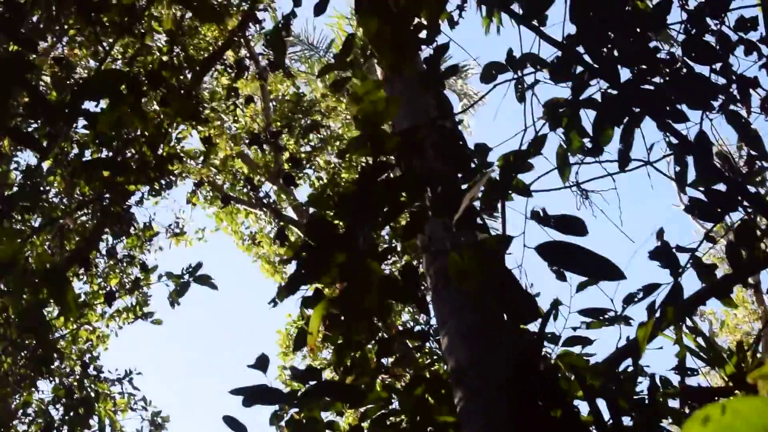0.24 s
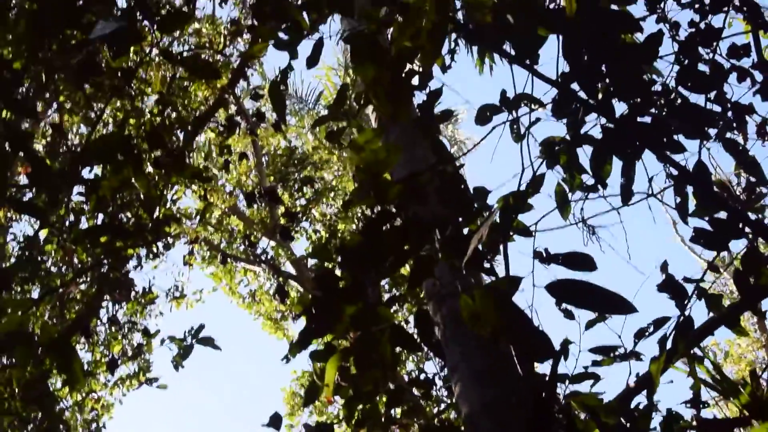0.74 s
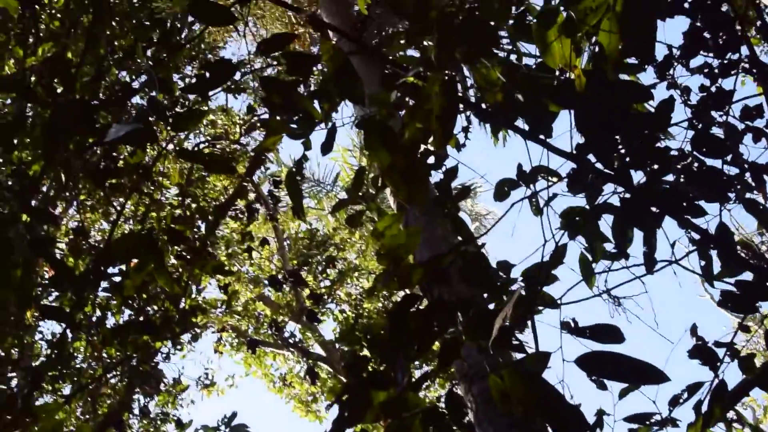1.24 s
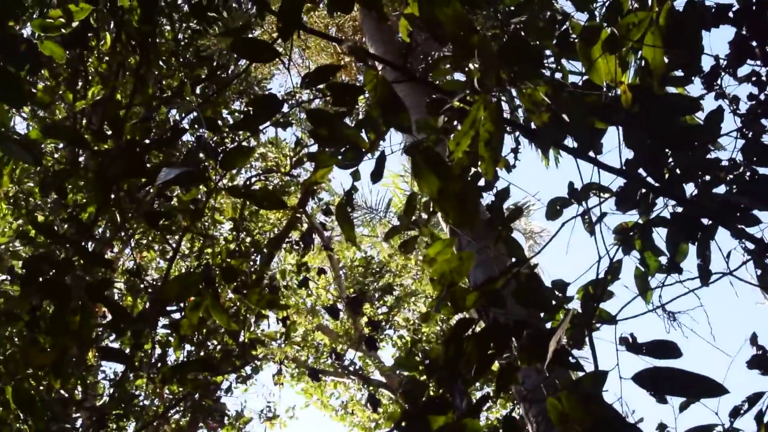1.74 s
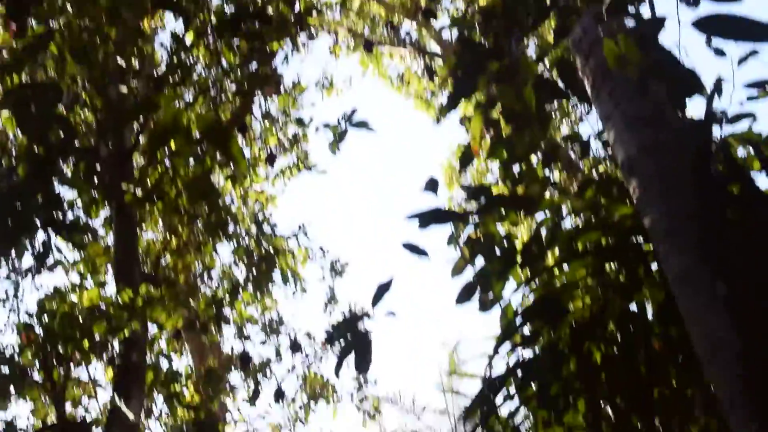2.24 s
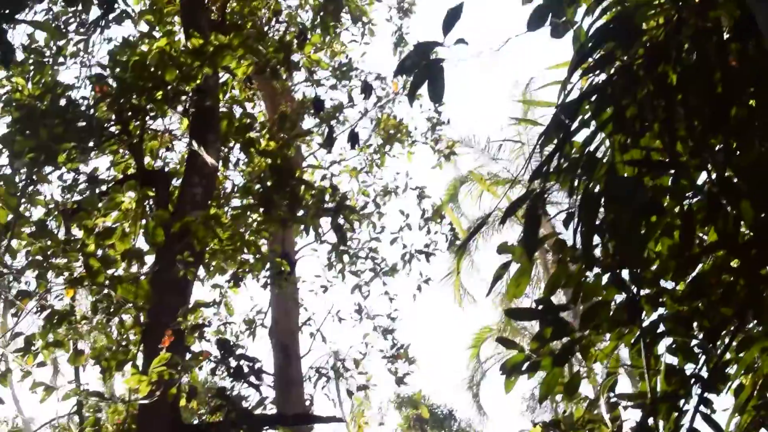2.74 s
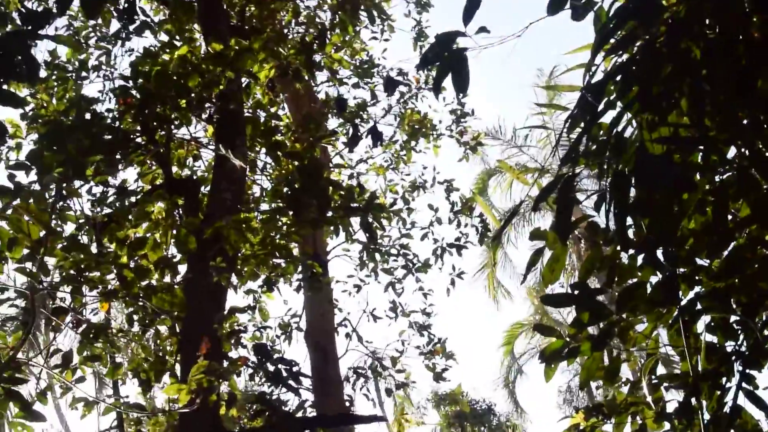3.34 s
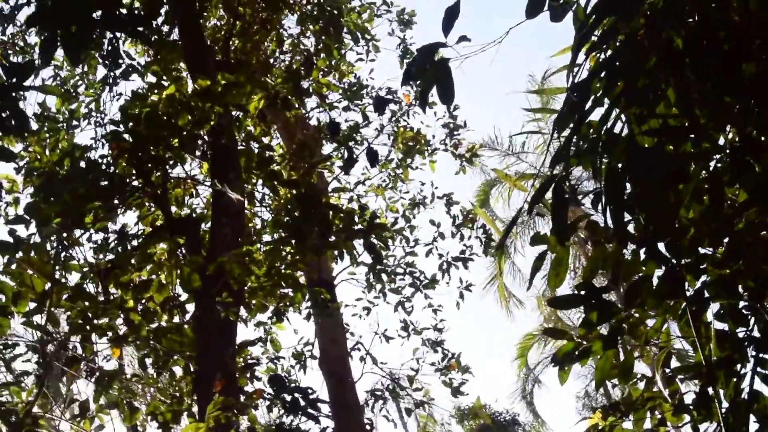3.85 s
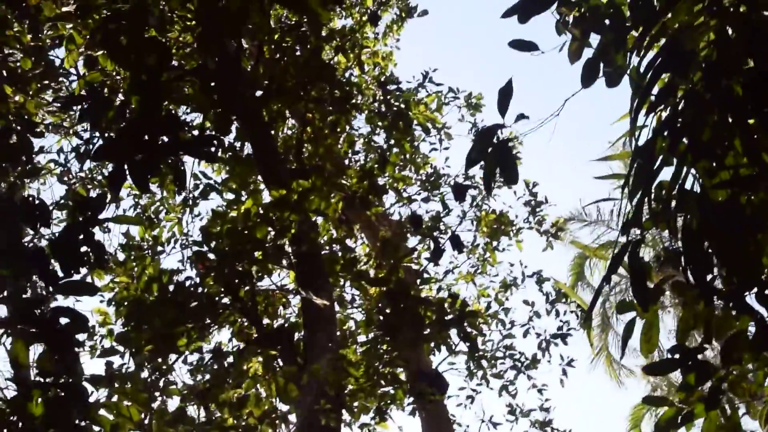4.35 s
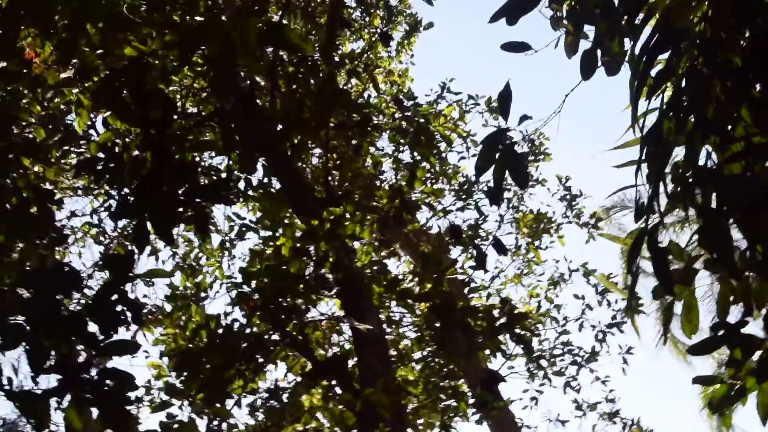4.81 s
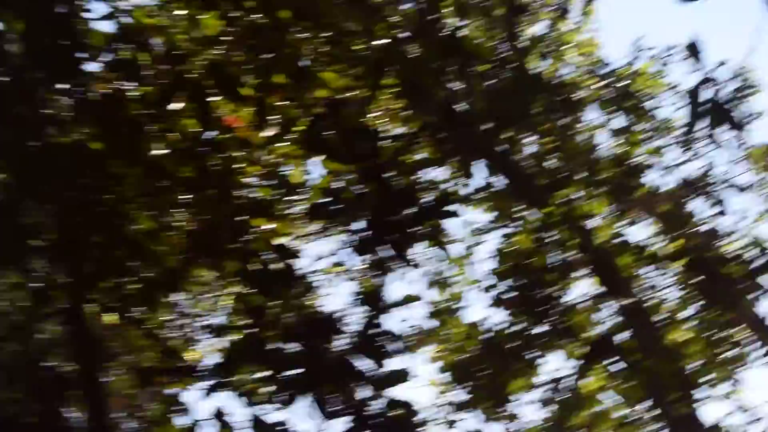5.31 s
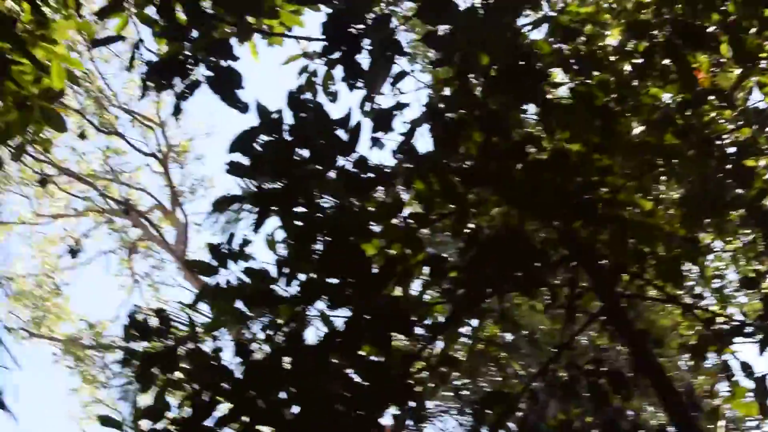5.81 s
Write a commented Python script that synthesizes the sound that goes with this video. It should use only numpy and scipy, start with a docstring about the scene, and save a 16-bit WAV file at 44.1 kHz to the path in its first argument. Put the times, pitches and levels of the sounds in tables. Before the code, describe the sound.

A huge camp of fruit bats squeals, rasps and chatters in forest trees, a dense continuous shrill din with a few nearer cries standing out.

```python
"""Fruit bat camp squabbling in the trees

A large camp of fruit bats squabbles high in forest trees. Hundreds of overlapping squeals, rasps and
chattering yaps merge into a shrill din; a few nearer bats stand out. Each cry is a train of voice pulses
mixed with rasping noise and shaped by a throat resonance. Trunks and leaves scatter the calls. Shaped noise
stands for the far side of the camp and the forest. Very faint low clicks of overload, where the loudest
cries clip, are short smooth pulses placed at set times; there is also a very faint hiss.
"""
import sys
import numpy as np
from scipy import signal
from scipy.fft import rfft, irfft, next_fast_len
from scipy.io import wavfile

SR = 44100
rng = np.random.default_rng(int(sys.argv[2]) if len(sys.argv) > 2 else 0)


def transcribe(signal):
    """Save signal, clipped to [-1, 1], as a 16-bit WAV file at the path in sys.argv[1]."""
    frames = np.atleast_2d(signal).T
    limited = np.clip(frames, -1, 1)
    pcm = np.round(limited * 32767).astype(np.int16)
    wavfile.write(sys.argv[1], SR, pcm)


N = 267775  # length of the scene in samples
PITCH_HZ = 545.6  # the usual pitch of a bat's voice
BAND_HZ = 9550  # upper limit of the voices' overtones, and of what the two channels pass


# Rise and fall of the din's low register: start_s, level_db (added to the level of the din)
LOW_CURVE = [(0.0, 0.5), (0.69, 0.5), (0.83, -0.5), (1.38, 1), (1.52, -0.8), (1.79, 1.3), (2.07, -0.3),
             (2.35, -0.2), (3.31, -1.0), (4.97, 0.26), (5.1, -0.3), (6.07, 0.15)]
# The same for the middle register: start_s, level_db
MIDDLE_CURVE = [(0.0, -1.5), (1.24, -2), (1.93, -0.1), (2.48, 1), (3.31, 0), (3.45, 1), (5.1, 0.5),
                (5.24, 2.5), (5.52, -2), (5.66, 1), (6.07, -1)]
# The same for the top register: start_s, level_db
TOP_CURVE = [(0.0, 1), (0.69, -1.9), (1.38, 1.0), (1.66, -1.5), (1.79, 1), (2.35, -1), (3.04, 1.4),
             (3.17, 0), (4.55, 0.2), (4.69, -1.5), (5.66, -0.3), (5.93, -3.5), (6.07, -1)]
# Centres of the three registers: centre_hz
REGISTER_CENTRES = [2700, 4250, 6600]


def colony():
    """The din of the camp swells and sinks a little in its low, middle and top register."""
    din = voices()
    out = np.zeros((2, N))
    time_s = np.arange(N) / SR
    curves = (LOW_CURVE, MIDDLE_CURVE, TOP_CURVE)
    for curve, share in zip(curves, np.eye(3)):
        # each register fades into its neighbours, so together they give back the whole din
        register = filtered(din, lambda hz: np.interp(np.log(hz + 1), np.log(REGISTER_CENTRES), share))
        level_db = np.interp(time_s, *np.transpose(curve))
        out += amp(level_db) * register
    return amp(-17.5) * out


def voices():
    """Seven kinds of call, each from its own crowd, over the blur of far animals."""
    squeals = crowd(count=200, throat_hz=2853, variety=0.14, length=0.06, syllables=2, rough=0.13,
                    scatter_db=0.5, glide=0.1, arch=0.0801, leak=1.0)
    whines = crowd(count=110, throat_hz=2930, variety=0.13, length=0.045, syllables=2, rough=0.077,
                   scatter_db=0.0, glide=0.043, arch=0.033, leak=0.48)
    shrieks = crowd(count=200, throat_hz=5240, variety=0.21, length=0.07, syllables=2, rough=0.2,
                    scatter_db=0.0, glide=0.0696, arch=0.0622, leak=0.087)
    yaps = crowd(count=170, throat_hz=2776, variety=0.16, length=0.02, syllables=5, rough=0.31,
                 scatter_db=-0.5, glide=0.1205, arch=0.086, leak=0.46)
    wails = crowd(count=130, throat_hz=3050, variety=0.16, length=0.1, syllables=1, rough=0.07,
                  scatter_db=0.1, glide=0.035, arch=0.015, leak=0.25)
    moans = crowd(count=190, throat_hz=1037, variety=0.053, length=0.05, syllables=1, rough=0.28,
                  scatter_db=-1.2, glide=0.073, arch=0.055, leak=0.01)
    grumbles = crowd(count=150, throat_hz=565, variety=0.04, length=0.06, syllables=1, rough=0.2,
                     scatter_db=-2.0, glide=0.064, arch=0.038, leak=0.002)
    shrill = amp(-6.0) * in_canopy(squeals, wet_db=-2.0)
    shrill += amp(-13.5) * in_canopy(whines, wet_db=-3.0)
    shrill += amp(-13.0) * in_canopy(shrieks, wet_db=-0.5)
    shrill += amp(-7.5) * in_canopy(yaps, wet_db=-1.5)
    shrill += amp(-14) * in_canopy(wails, wet_db=-1.5)
    murmur = amp(-33.0) * in_canopy(moans, wet_db=-4.0)
    murmur += amp(-39.5) * in_canopy(grumbles, wet_db=5.0)
    return spread(shrill + murmur + amp(-4.0) * far_side())


def crowd(count, throat_hz, variety, length, syllables, rough, scatter_db, glide, arch, leak):
    """Many bats, each giving a bout of like calls; they are shared out between two halves of the camp."""
    halves = np.zeros((2, N))
    bats = np.clip(rng.standard_normal((count, 5)), -1.7, 1.7)
    bouts = rng.random((count, 8, 2))
    for i, ((size, voice, mouth, loud, harsh), bout) in enumerate(zip(bats, bouts)):
        # bouts start at roughly even steps, the first ones just before the scene opens
        start_s = (i + bout[0, 0]) / count * (N / SR + 0.4) - 0.4
        length_s = length * np.exp(0.35 * size)
        pitch_hz = PITCH_HZ * np.exp(0.11 * voice)
        own_throat_hz = throat_hz * np.exp(variety * mouth)
        own_rough = rough * np.exp(0.5 * harsh)
        # bats are loudest near their usual resonance
        level_db = scatter_db * loud + along(VOICE_TONE, own_throat_hz)
        calls = 1 + i % round(syllables)
        for pause, slide in bout[:calls]:
            own_glide = glide * (2 * slide - 1)  # up or down
            call = cry(length_s, pitch_hz, own_throat_hz, own_rough, own_glide, arch, leak)
            add(halves[i % 2], start_s, amp(level_db) * call)
            start_s += length_s * (1.3 + pause)
    return unit(halves)


# Tone balance of many bats together: frequency_hz, level_db (relative)
VOICE_TONE = [(100, -69), (350, -52.5), (560, -31.5), (780, -34), (1080, -26), (1450, -26.5), (1800, -11),
              (2150, -1), (2550, 1), (3100, 1), (4000, -3.5), (5300, -8), (7200, -7), (9300, -12.5)]


def cry(length, pitch_hz, throat_hz, rough, glide, arch, leak=0.061, jitter=0.047, rattle_db=4.5):
    """One cry: pulses from the larynx on an arched pitch, mixed with a rattling rasp, through the throat."""
    n = max(int(length * SR), SR // 100)
    rough = np.clip(rough, 0, 1)
    u = np.linspace(-1, 1, n)  # from the start to the end of the cry
    bend = glide * u + arch * (1 / 3 - u * u)
    bend += 0.0035 * wobble(60, n)  # a slower waver, as a share of the pitch
    bend += (0.0036 + jitter * rough) * wobble(220, n)  # a quick shake, stronger in harsh cries
    cycles = np.cumsum(pitch_hz * np.exp(bend)) / SR + rng.random()
    offset = cycles % 1 - 0.5  # place within each cycle
    opening = np.cos(np.pi * offset) ** 2
    pulses = unit(np.sinc(2 * BAND_HZ / pitch_hz * offset) * opening)
    rasp = unit(rng.standard_normal(n) * opening)
    source = np.sqrt(1 - rough ** 2) * pulses + rough * rasp
    source *= amp(rattle_db * np.sqrt(rough) * wobble(260, n))
    source *= np.sqrt(np.abs(1 - u * u))  # swells and fades
    source = np.pad(source, (32, 160))  # room for the throat to ring
    width_hz = throat_hz * (0.13 + 0.39 * rough)  # a harsh cry comes from a wide, damped mouth

    def throat_and_leaves(hz):
        damping = 1j * hz * width_hz
        resonance = (damping / (throat_hz ** 2 - hz * hz + damping)) ** 2
        throat = resonance + leak * amp(along(VOICE_TONE, hz))
        leaves = 1 / np.sqrt(1 + (hz / 8200) ** 10)  # foliage swallows the highest overtones
        return throat * leaves

    return unit(filtered(source, throat_and_leaves))


def near_bats():
    """The closest animals squeal, screech and moan above the din; the forest answers."""
    direct = near_squeals() + near_screeches() + near_moans()
    return direct + amp(-8.5) * spread(forest(direct.mean(axis=0)))


# Clear squeals of nearer bats: start_s, length_s, throat_hz (resonance),
# level_db (before the gain of the group), glide_share (of the pitch, either side of the middle)
NEAR_SQUEALS = [(0.0, 0.07, 3560, -27.5, 0.014), (0.105, 0.024, 2574, -19, -0.012),
                (0.13, 0.048, 2620, -33, 0.029), (0.172, 0.034, 2516, -21, 0.0017),
                (0.21, 0.088, 4250, -29.5, -0.0051), (0.222, 0.06, 2570, -25, -0.022),
                (0.31, 0.2, 3440, -26.5, 0.006), (0.53, 0.095, 3530, -27, -0.012),
                (0.56, 0.16, 2934, -30, -0.017), (0.64, 0.13, 3520, -33, .008),
                (0.93, 0.26, 2552, -26.5, -0.0021), (1.01, 0.061, 3790, -31, -0.014),
                (1.08, .15, 5150, -36, .015), (1.25, 0.057, 1770, -35, 0.03), (1.4, .07, 5920, -34.5, 0),
                (1.71, 0.056, 2050, -33, -0.0044), (2.33, 0.043, 4000, -30, 0.019),
                (2.395, 0.04, 4280, -25.5, -0.0018), (2.44, .05, 4700, -32, .01),
                (2.545, 0.085, 2170, -26, 0.012), (2.66, 0.072, 4440, -33, 0.0064),
                (2.77, 0.06, 3400, -23, 0.0041), (2.79, 0.081, 4450, -31.5, -0.00018),
                (2.81, 0.058, 6850, -33, .004), (2.89, 0.094, 2480, -30, -0.012),
                (2.91, .06, 3270, -26.5, .015), (3.02, 0.042, 3000, -24, 0.029),
                (3.17, .06, 3250, -28.5, 0.0074), (3.425, 0.065, 3260, -29, -0.0011),
                (3.43, 0.038, 4830, -29, 0.0059), (3.5, 0.073, 4930, -29, 0.0071),
                (3.52, 0.059, 3200, -24, .02), (3.6, 0.12, 3845, -31, .004),
                (3.68, 0.05, 4450, -29.5, -0.0036), (3.68, 0.076, 4975, -33, 0),
                (4.03, 0.093, 3900, -30, -.015), (4.09, 0.15, 2550, -27, 0.01),
                (4.19, 0.051, 3230, -25.5, -0.0041), (4.3, .14, 3660, -31.5, -0.012),
                (4.35, 0.15, 4210, -32.5, 0.0016), (4.325, 0.062, 2555, -24, 0.012),
                (4.58, 0.069, 2744, -24, -0.00037), (4.65, 0.06, 2910, -26, 0.0077),
                (4.715, 0.045, 2316, -25, -0.009), (4.795, 0.16, 2450, -23.5, 0.0023),
                (4.955, 0.031, 2440, -30, 0.0035), (4.9, 0.11, 2000, -31.5, -0.012),
                (5.02, .08, 1883, -36, -0.021), (5.345, 0.066, 2490, -22, -0.033),
                (5.59, 0.063, 3230, -25.5, 0.03), (5.62, 0.064, 3060, -32, 0.0094),
                (5.67, 0.11, 2544, -28, 0.0072), (5.76, 0.17, 3600, -33, 0.0051)]


def near_squeals():
    """Clear cries, made mostly of voice pulses with little rasp."""
    return amp(-3.0) * near_cries(NEAR_SQUEALS, rough=0.062)


# Harsh screeches of nearer bats: start_s, length_s, throat_hz (resonance),
# level_db (before the gain of the group)
NEAR_SCREECHES = [(0.309, 0.051, 2887, -24), (0.508, 0.079, 2622, -21.5), (0.727, .1, 2924, -27),
                  (1.378, 0.06, 2100, -27), (1.382, 0.073, 6160, -33), (1.749, 0.22, 2860, -28),
                  (2.28, 0.058, 3175, -21), (2.427, 0.15, 4590, -29), (3.024, 0.11, 7400, -34),
                  (3.022, 0.077, 2922, -24), (3.666, 0.078, 4850, -41), (4.026, 0.14, 3870, -29),
                  (4.455, 0.16, 3410, -27), (5.193, 0.19, 3720, -28.5)]


def near_screeches():
    """Harsh cries with much rasp and a wide throat resonance; their pitch does not glide."""
    rows = [(*row, 0) for row in NEAR_SCREECHES]
    return amp(-2.5) * near_cries(rows, rough=0.686)


# Soft, low moans of nearer bats: start_s, length_s, throat_hz (resonance),
# level_db (before the gain of the group), glide_share (of the pitch, either side of the middle)
NEAR_MOANS = [(0.85, 0.088, 994, -47, -0.033), (0.91, 0.086, 1383, -45.5, -0.0053),
              (1.1, 0.064, 1190, -50, -0.032), (1.34, .09, 1010, -47, -0.003),
              (1.84, 0.083, 1030, -48, -0.0048), (1.97, 0.07, 1000, -54, -0.0036),
              (2.14, 0.069, 994, -50, -0.00043), (2.6, 0.25, 1034, -57, -0.026),
              (2.78, 0.063, 990, -48, -0.018), (3.07, 0.073, 968, -48.5, -0.0051),
              (3.2, 0.1, 970, -50.5, -0.0088), (3.35, 0.1, 1053, -49.5, -0.004),
              (3.79, 0.079, 1008, -47, -0.017), (3.91, .11, 1026, -47, -0.0088),
              (4.34, 0.092, 1103, -49, -0.0096), (4.5, 0.1, 1094, -52, -0.0055),
              (5.07, 0.08, 1397, -44, -0.013), (5.24, 0.089, 1004, -48, -0.011),
              (5.39, 0.09, 1060, -45.5, 0.0023), (5.58, 0.069, 1003, -48, 0.0084),
              (5.95, .1, 1100, -46.5, -0.022)]


def near_moans():
    """Soft cries with a low throat resonance and some rasp."""
    return amp(0.5) * near_cries(NEAR_MOANS, rough=0.39)


def near_cries(rows, rough):
    """An overtone of each cry meets the throat resonance; the cry reaches one microphone a little earlier."""
    direct = np.zeros((2, N))
    leads_s = 3e-5 * rng.standard_normal(len(rows))
    sides = np.array([[1], [-1]])
    for (start_s, length_s, throat_hz, level_db, glide), lead_s in zip(rows, leads_s):
        pitch_hz = throat_hz / round(throat_hz / PITCH_HZ)
        sound = cry(length_s, pitch_hz, throat_hz, rough, glide, arch=0.0081)
        flutter_db = 2.0 * (1 - rough) * wobble(90, len(sound))  # clear cries falter most in level
        sound = amp(level_db) * unit(sound * amp(flutter_db))
        pair = filtered(sound, lambda hz: np.exp(1j * np.pi * hz * lead_s * sides))
        add(direct, start_s, pair)
    return direct


# Very faint low clicks of overload where the loudest cries clip: middle_s, peak_level_db
OVERLOAD_CLICKS = [(0.358, -65), (0.614, -57), (1.954, -65), (2.329, -67), (2.754, -70), (3.349, -64),
                   (3.754, -68), (4.374, -69), (4.739, -64), (5.474, -63), (5.764, -62)]


def overload_clicks():
    """Very faint low clicks of overload where the loudest cries clip: smooth one-sided pulses at set times."""
    out = np.zeros(N)
    length_s = 0.008
    for middle_s, level_db in OVERLOAD_CLICKS:
        add(out, middle_s - length_s / 2, amp(level_db) * np.hanning(int(length_s * SR)))
    return out


# Tone balance of the far side of the camp and the forest: frequency_hz, level_db (relative)
FAR_TONE = [(25, -58.5), (85, -59), (150, -42), (330, -33), (560, -22), (780, -25), (1100, -21),
            (1600, -16), (2050, -8), (2500, 1), (3300, -5.5), (4800, -8), (7200, -15), (9300, -28)]


def far_side():
    """So many far sounds blur together that shaped noise stands for them."""
    noise = rng.standard_normal((2, N))
    return unit(filtered(noise, lambda hz: amp(along(FAR_TONE, hz))))


def in_canopy(x, wet_db):
    """Voices heard partly straight, partly through the trees."""
    return unit(x + amp(wet_db) * forest(x))


# How long the forest's echo takes to fade by 60 dB: frequency_hz, fade_s
FOREST_FADE = [(300, 0.3), (2500, 1), (9000, 0.22)]


def forest(x):
    """Scatter from trunks and leaves: two fading noise tails, each pitch range at its own pace."""
    noise = rng.standard_normal((2, SR // 2))
    hz, time_s, grid = signal.stft(noise, SR, nperseg=256)
    fade = amp(-60 * time_s / along(FOREST_FADE, hz)[:, None])
    tail = signal.istft(grid * fade, SR, nperseg=256)[1]
    tail = tail / np.linalg.norm(tail[0])
    return signal.fftconvolve(np.atleast_2d(x), tail, axes=1)[:, :N]


# How alike left and right are: frequency_hz, likeness (1 = the same, 0 = unrelated)
LIKENESS = [(60, 1), (180, 0.99), (320, 1), (550, 0.98), (960, 0.93), (1680, 0.82), (2930, 0.66),
            (5110, 0.2), (8900, 0.071)]


def spread(pair):
    """Two unrelated signals as a diffuse field at two close microphones, most alike in the bass."""
    def middle_and_side(hz):
        angle = np.arccos(np.clip(along(LIKENESS, hz), -1, 1)) / 2
        return np.array([np.cos(angle), np.sin(angle)])

    middle, side = filtered(pair, middle_and_side)
    return np.array([middle + side, middle - side])


def amp(db):
    """Decibels to gain."""
    return 10 ** (np.asarray(db) / 20)


def unit(x):
    """Scale to an average (rms) level of 1."""
    return x / np.sqrt(np.mean(x ** 2) + 1e-20)


def along(points, hz):
    """Read a curve of (frequency_hz, value) points on a log axis."""
    f, v = np.transpose(points)
    return np.interp(np.log(hz + 1), np.log(f + 1), v)


def wobble(rate, size):
    """A wandering random curve with rate turning points drawn a second."""
    knots = rng.standard_normal(int(size * rate / SR) + 2)
    return np.interp(np.arange(size) * rate / SR, np.arange(len(knots)), knots)


def filtered(x, response):
    """Multiply the spectrum of x by a response that depends on frequency."""
    n = x.shape[-1]
    m = next_fast_len(n + 256)
    return irfft(rfft(x, m) * response(np.fft.rfftfreq(m, 1 / SR)), m)[..., :n]


def add(track, start_s, sound):
    """Mix a sound into a track, leaving out what falls outside the scene."""
    i = int(start_s * SR)
    part = sound[..., max(-i, 0):max(N - i, 0)]
    track[..., max(i, 0):max(i, 0) + part.shape[-1]] += part


def scene():
    """The whole camp, with the overload clicks."""
    return colony() + near_bats() + overload_clicks()


# Level difference between the two channels: frequency_hz, left_minus_right_db
CHANNEL_LEAN = [(60, -2.5), (120, 2.5), (250, -1), (510, 1), (1040, 1.0), (2130, 0.5), (4360, -1),
                (8900, -0.5)]


def record(dry):
    """The two slightly unlike channels pass little treble; a very faint hiss lies over the highest treble."""
    top_hz = 15100  # nothing is left above this
    halves = np.array([[0.5], [-0.5]])  # each channel takes half of the difference

    def channels(hz):
        treble_cut = 1 / np.sqrt(1 + (hz / BAND_HZ) ** 160)
        return amp(along(CHANNEL_LEAN, hz) * halves) * treble_cut

    heard = filtered(dry, channels)
    # the hiss grows stronger with frequency
    hiss = amp(-61.5) * filtered(rng.standard_normal((2, N)), lambda hz: hz / top_hz)
    return filtered(heard + hiss, lambda hz: hz < top_hz)


dry = scene()
out = record(dry)
transcribe(out)
```